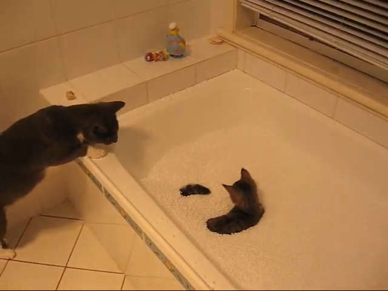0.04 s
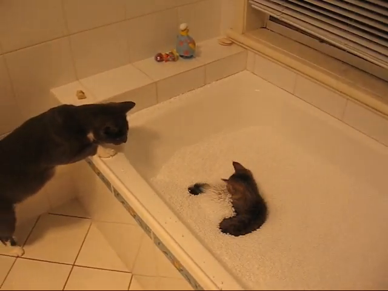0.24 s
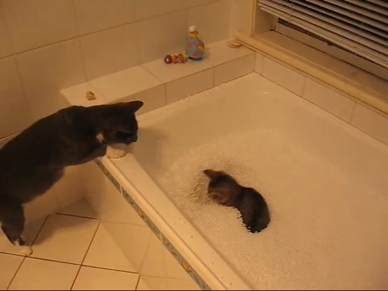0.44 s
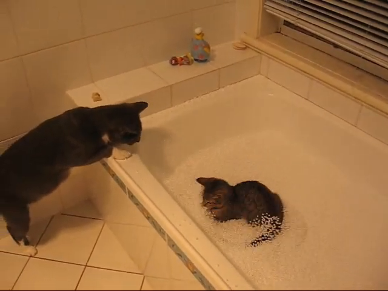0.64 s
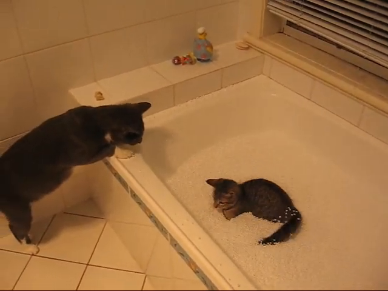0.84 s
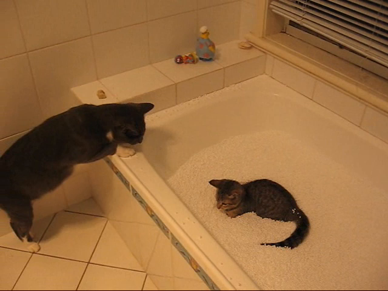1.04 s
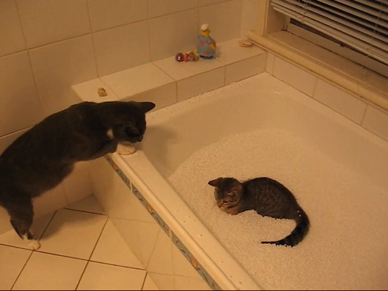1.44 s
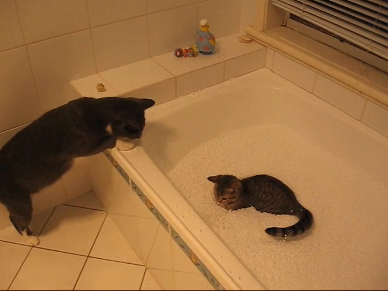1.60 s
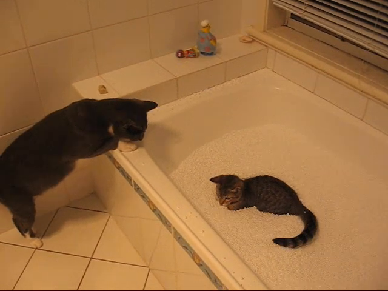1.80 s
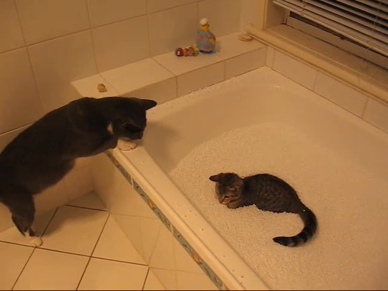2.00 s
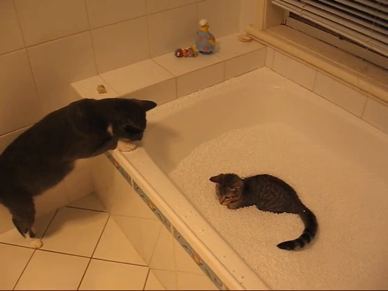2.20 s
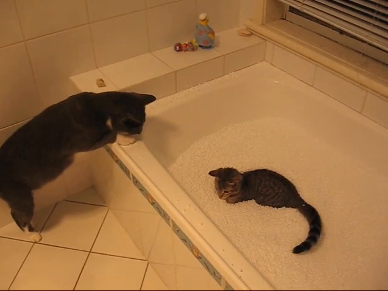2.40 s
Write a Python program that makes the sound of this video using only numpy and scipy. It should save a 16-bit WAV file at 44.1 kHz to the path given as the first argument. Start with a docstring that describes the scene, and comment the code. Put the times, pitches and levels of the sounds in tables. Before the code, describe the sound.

Foam beads rustling as a kitten wades through a bathtub, with a few hollow knocks.

```python
"""Kitten in a tub of foam beads

A kitten wades through loose foam beads in a bathtub, settles, then shoves once more. Countless
tiny contacts add up to a rustle; knocks and skids of the paws excite the normal modes of the hollow
tub, and a tiled room reverberates. A small camera adds a pulsing whirr, one electrical click
and the grainy hiss of 8-bit quantisation."""
import sys
import numpy as np
from scipy import signal
from scipy.fft import rfft, irfft
from scipy.io import wavfile
from scipy.ndimage import uniform_filter1d

SR = 44100
rng = np.random.default_rng(int(sys.argv[2]) if len(sys.argv) > 2 else 0)


def digitize_waveform(pressure):
    """Quantize a signal to 16-bit integers and store it at the path in sys.argv[1].

    Rows of a 2-D input are taken as channels; values are limited to [-1, 1].
    """
    field = np.atleast_2d(pressure).T
    bounded = np.clip(field, -1, 1)
    quanta = np.round(bounded * 32767).astype(np.int16)
    wavfile.write(sys.argv[1], SR, quanta)


N = 112454
HOLD = 4  # samples for which the converter holds each value
ROOM_T60_S, LOW_T60_S = .5, 1.1  # low sounds linger longer in the room


def undb(db):
    """Amplitude ratio of a level in decibels."""
    return 10 ** (np.asarray(db) / 20)


def unit(x):
    """Normalisation to rms 1."""
    return x / np.sqrt(np.mean(x ** 2))


def clock():
    """Time of every sample, t/s."""
    return np.arange(N) / SR


def colour(x, spectrum):
    """Spectral shaping by (f/Hz, level/dB) points, to rms 1 below the converter's Nyquist frequency."""
    hz, db = np.array(spectrum).T
    f = np.maximum(np.arange(N // 2 + 1) * SR / N, 1)
    gain = undb(np.interp(np.log(f), np.log(hz), db)) * (f < SR / HOLD / 2)
    return unit(irfft(rfft(x) * gain, N))


def ticks(per_s=11000, spread_db=3):
    """Shot noise: tiny independent contacts of random sign and uneven size."""
    contacts = rng.random(N) < per_s / SR
    return contacts * rng.choice([-1, 1], N) * undb(spread_db * rng.standard_normal(N))


def strokes(table):
    """Incoherent addition: pushes with a Gaussian rise and exponential fall sum in power."""
    t = clock()
    power = 0
    for at, db, rise, fall in table:
        exponent = np.where(t < at, ((t - at) / rise) ** 2, (t - at) / fall)
        power += (undb(db) * np.exp(-exponent)) ** 2
    return np.sqrt(power)


def ring(x, response):
    """Convolution with an impulse response scaled to unit energy."""
    return signal.fftconvolve(x, response / np.linalg.norm(response))[:N]


def room(x, wet_db, t60):
    """Reverberation: dense reflections from the tiles add an exponentially decaying tail."""
    tail = rng.standard_normal(N) * np.exp(-np.log(1000) * clock() / t60)
    return x + undb(wet_db) * ring(x, tail)


def background_hiss(level_db=-52.2):
    """Stationary noise: a hiss, strongest in the lows, with the whirr's faint overtone near 3270 Hz."""
    # spectrum of the hiss and the overtone: f/Hz, relative level/dB
    spectrum = [(30, 0), (80, -1), (170, -2), (300, 1), (480, 0), (800, -6.5), (1500, -9.5), (2900, -12),
                (3270, -7), (3600, -11), (5400, -16)]
    return undb(level_db) * colour(rng.standard_normal(N), spectrum)


def whirr(centre_hz=2019, width_hz=175, floor_db=-55.5, swell_s=.04, flutter_hz=75.9, depth=.45):
    """Amplitude modulation: a narrow noise band, likely the camera's focus motor, flutters and swells."""
    # swells of the whirr: t/s, level/dB
    swells = [(.04, -46.5), (1.17, -47), (1.40, -49.5), (1.83, -47), (2.00, -48.5), (2.06, -47),
              (2.265, -47), (2.46, -46.5)]
    t = clock()
    f = np.arange(N // 2 + 1) * SR / N
    band = irfft(rfft(rng.standard_normal(N)) * np.exp(-2 * ((f - centre_hz) / width_hz) ** 2), N)
    tone = unit(band / np.abs(signal.hilbert(band)) ** .5)  # partly evens out the envelope
    wander = unit(uniform_filter1d(rng.standard_normal(N), size=900))
    flutter = 1 + depth * np.sin(2 * np.pi * np.cumsum(flutter_hz * (1 + .2 * wander)) / SR)
    swell_power = sum(undb(db) ** 2 * np.exp(-((t - at) / swell_s) ** 2) for at, db in swells)
    return tone * flutter * np.sqrt(undb(floor_db) ** 2 + swell_power)


def click(at_s=1.2986, length_s=.00078, hz=2516, gain_db=-4.7, bias=.22):
    """Electrical transient: an offset sine burst so short that its spectrum is broad."""
    age = clock() - at_s
    return undb(gain_db) * (bias - np.sin(2 * np.pi * hz * age)) * (age >= 0) * (age < length_s)


def tub(age, weight):
    """Modal superposition: the struck tub rings as damped sinusoids, weighted by frequency."""
    # normal modes of the tub: f/Hz, relative level/dB, T60/s
    modes = [(84, -13, .35), (101, -12, .45), (174, -8, .3), (208, -6.5, .27), (236, 0, .58),
             (251, -8, .25), (287.6, -7.5, .7), (343, -11, .55), (380, -8, .5), (468, -5.5, .5),
             (535, -10.5, .6), (573.5, -14, .7), (784, -10, .3), (845, -13, .35), (985, -8.5, .4),
             (1190, -12, .4)]
    return sum(weight(hz) * undb(db) * np.sin(2 * np.pi * hz * age) * np.exp(-np.log(1000) * age / t60)
               for hz, db, t60 in modes)


def skids(ring_db=-7):
    """Frictional excitation: paws grind beads along the wall and drive the modes of the tub."""
    # skids of the paws: t/s, level/dB, rise/s, fall/s
    slides = [(.79, -39, .012, .03), (.838, -32, .016, .04), (1.13, -52, .1, .12),
              (1.556, -26.5, .004, .035), (1.585, -28.5, .01, .055), (1.675, -37.5, .02, .08)]
    # spectrum of the friction: f/Hz, relative level/dB
    spectrum = [(60, -33), (120, -13), (185, -2), (255, -7), (370, -0.5), (560, -1.5), (850, -7),
                (1400, -9), (2200, -17), (5000, -28)]
    opening = undb(-50) * np.exp(-clock() / .16)  # a move already dying away at the start
    rub = colour(ticks(), spectrum) * (strokes(slides) + opening)
    body = ring(rub, tub(clock(), lambda hz: hz / (hz + 600)))
    return room(rub + undb(ring_db) * np.std(rub) * unit(body), wet_db=-7, t60=LOW_T60_S)


def knocks(contact_s=.005, thud_db=5, thud_s=.016):
    """Soft impact: a padded paw eases into the modes that its point of contact favours."""
    # knocks on the tub: t/s, level/dB, favoured f/Hz, spread/octaves
    impacts = [(.781, -34, 210, .8), (.829, -25, 230, .65), (.884, -39, 310, .3), (1.548, -22.5, 580, .7),
               (1.557, -21.5, 190, .22)]
    out = 0
    for at, db, centre, spread in impacts:
        age = np.maximum(clock() - at, 0)
        ringing = tub(age, lambda hz: np.exp(-.5 * (np.log2(hz / centre) / spread) ** 2))
        onset = 1 - np.exp(-(age / contact_s) ** 2)
        thud = 1 + undb(thud_db) * np.exp(-age / thud_s)  # louder while the paw presses
        out += undb(db) * ringing * onset * thud
    return room(out, wet_db=-8, t60=ROOM_T60_S)


def beads():
    """Granular noise: colliding beads rustle when stirred, swish when flicked and churn when ploughed."""
    # strength of the stirring in each of three moves: t/s, level/dB
    settle = [(0, -47), (.08, -51), (.17, -58)]
    wade = [(.17, -55), (.22, -29.8), (.25, -26.8), (.31, -28.5), (.345, -25), (.41, -27.3), (.445, -25.4),
            (.495, -23.4), (.56, -29.5), (.66, -34.3), (.72, -32.6), (.77, -32.2), (.82, -28),
            (.865, -35.8), (.94, -42), (1.03, -52), (1.2, -59)]
    shove = [(1.48, -56), (1.512, -37), (1.54, -39), (1.555, -30), (1.615, -38.5), (1.71, -35.4),
             (1.76, -42), (1.84, -54)]
    # paws flicking surface beads and ploughing deep: t/s, level/dB, rise/s, fall/s
    flicks = [(.348, -27, .018, .04)]
    ploughs = [(.25, -37, .035, .06), (.40, -42, 0.035, .035), (.495, -31.5, .02, .033),
               (.555, -37, .018, .02), (.835, -38, .045, .045)]
    # spectra of the broad rustle, bright swish and dull churn: f/Hz, relative level/dB
    rustle_spectrum = [(100, -12), (175, -3), (260, -7), (480, -.5), (800, -1.5), (1150, -4.5),
                       (1700, -1.5), (2700, 0), (4000, -2.7), (5400, -5.7)]
    swish_spectrum = [(500, -20), (1800, -9), (3500, 0), (5400, -4)]
    churn_spectrum = [(40, -20), (65, -5), (92, 7.5), (125, -7), (190, -5), (300, -12), (500, -8),
                      (900, -10), (1500, -14), (3500, -20.5)]
    stir = sum(undb(np.interp(clock(), *np.array(move).T, left=-np.inf, right=-np.inf))
               for move in (settle, wade, shove))
    rustle = stir * colour(ticks(), rustle_spectrum)
    swish = strokes(flicks) * colour(ticks(), swish_spectrum)
    churn = strokes(ploughs) * colour(ticks(), churn_spectrum)
    return room(rustle + swish + churn, wet_db=-12, t60=ROOM_T60_S)


def scene():
    """Superposition: hiss, beads and tub through a microphone without deep bass, plus whirr and click."""
    heard = background_hiss() + beads() + knocks() + skids()
    low_cut = signal.butter(3, 45, "high", fs=SR, output="sos")
    return (signal.sosfilt(low_cut, heard) + whirr() + click())[None]


def record(dry, step=1 / 128, bias_steps=-.7, top_hz=15600):
    """Quantisation to 8-bit steps adds hiss; a zero-order hold mirrors the spectrum into the treble."""
    coarse = step * np.round(dry[:, ::HOLD] / step + bias_steps)
    held = np.repeat(coarse - coarse.mean(), HOLD, axis=1)[:, :N]
    low_pass = signal.ellip(10, .1, 90, top_hz, fs=SR, output="sos")
    return signal.sosfilt(low_pass, held)


dry = scene()
out = record(dry)
digitize_waveform(out)
```